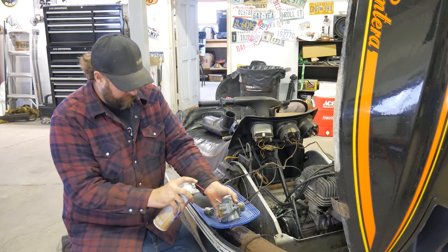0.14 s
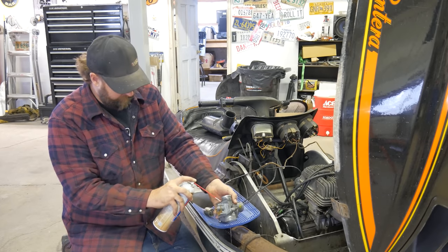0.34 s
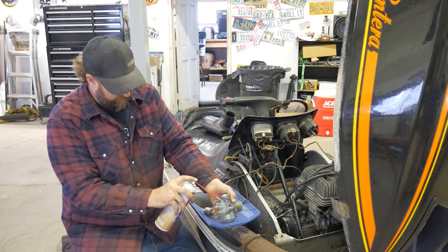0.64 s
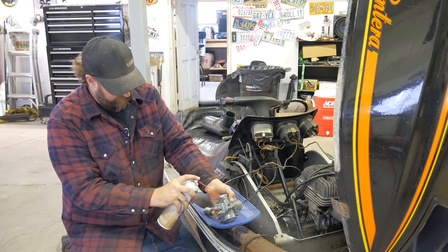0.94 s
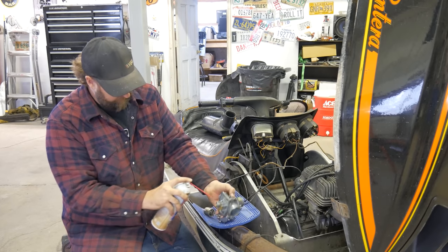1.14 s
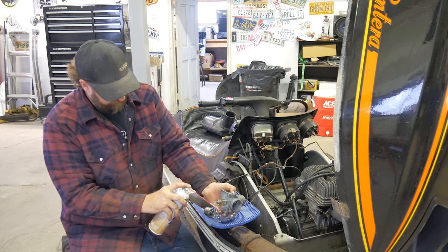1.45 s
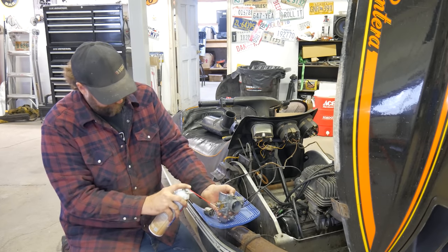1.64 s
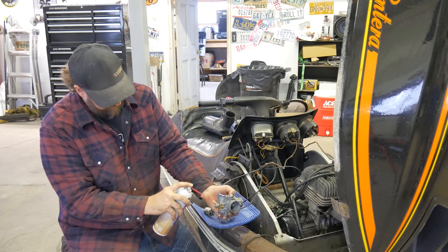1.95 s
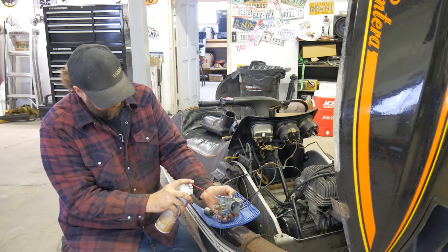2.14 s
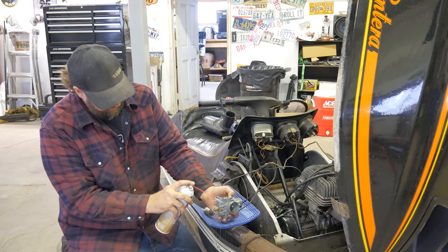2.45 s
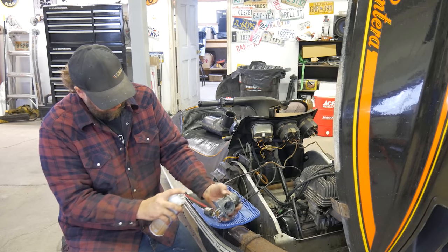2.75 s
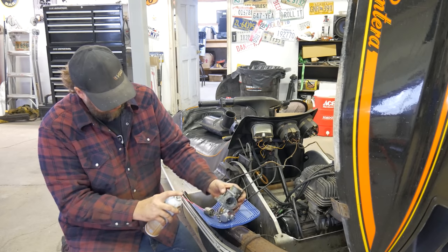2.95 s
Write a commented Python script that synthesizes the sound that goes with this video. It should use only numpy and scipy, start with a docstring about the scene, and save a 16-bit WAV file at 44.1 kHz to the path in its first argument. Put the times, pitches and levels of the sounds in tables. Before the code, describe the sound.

Aerosol spray hisses against a carburetor in a live workshop, centred and fairly close, over faint ventilation and machine hum. A previous spray's tail fades; bursts run 0.14-1.05, 1.4-2.07, 2.2-2.4 and 2.47-2.65 seconds, bright and fluttering, with wet spatters and breathy hollow resonances. A tiny whistling spit comes at 2.45. Room ring follows each stop; light metal ticks from 2.78, soft plastic tray knocks around 3.0.

```python
"""Four bursts of aerosol cleaner are sprayed into a hand-held carburetor in a workshop.
The jet is coloured noise that hisses and flutters; short noise slaps are heavy drops hitting the metal.
Bores ring as bands of noise while the jet crosses them, and the valve spits a brief whistle between bursts.
Small metal ticks are dying bands of noise; at the end, fading sine tones make soft knocks on a tray.
The room rings on as dying noise, over faint ventilation noise and a machine hum."""
import sys
import numpy as np
from scipy import signal
from scipy.fft import rfft, irfft
from scipy.io import wavfile

SR = 44100
rng = np.random.default_rng(int(sys.argv[2]) if len(sys.argv) > 2 else 0)


def unload_audio(sound):
    """Save the sound as a 16-bit wav file, at the path given as the first command line argument."""
    columns = np.transpose(np.atleast_2d(sound))
    # keep every value between -1 and 1, then stretch to whole-number steps
    steps = np.round(np.clip(columns, -1, 1) * 32767)
    wavfile.write(sys.argv[1], SR, steps.astype(np.int16))


N = 136710
TIME = np.arange(N) / SR   # seconds


def from_db(db):
    """Turn decibels into gain."""
    return 10 ** (np.asarray(db) / 20)


def rms_one(x):
    """Scale to an rms of 1."""
    return x / np.sqrt(np.mean(x ** 2) + 1e-20)


def at_hz(points, hz):
    """Read a table between its points, on a log-frequency axis."""
    point_hz, value = np.transpose(points)
    return np.interp(np.log(np.maximum(hz, 1)), np.log(point_hz), value)


def colour(x, spectrum, peaks=()):
    """Filter a steady signal with a broad spectrum plus peaks and dips, then scale it to rms 1."""
    hz = np.arange(N // 2 + 1) * SR / N
    db = at_hz(spectrum, hz)
    for peak_hz, width_hz, gain_db in peaks:
        db = db + gain_db / (1 + (2 * (hz - peak_hz) / width_hz) ** 2)
    low_cut = hz / (hz + 20)
    return rms_one(irfft(rfft(x) * from_db(db) * low_cut, N))


def band_noise(hz, width_hz):
    """Noise kept to one band, like a roughly blown resonance; rms 1."""
    edges_hz = np.clip([hz - width_hz / 2, hz + width_hz / 2], 20, .45 * SR)
    band_pass = signal.butter(2, edges_hz, "band", fs=SR, output="sos")
    return rms_one(signal.sosfilt(band_pass, rng.standard_normal(N)))


def bands(x, count):
    """Split into overlapping bands that add up to the whole: (Hz, band)."""
    centres_hz, spectrum = np.geomspace(200, 16000, count), rfft(x)
    hz = np.arange(len(spectrum)) * SR / N
    for centre_hz, weights in zip(centres_hz, np.eye(count)):
        yield centre_hz, irfft(spectrum * np.interp(hz, centres_hz, weights), N)


def drift(rate_hz):
    """Smooth random wandering with rms 1, made by low-passing noise twice."""
    r = np.exp(-2 * np.pi * rate_hz / SR)
    wander = signal.lfilter([1], [1, -2 * r, r * r], rng.standard_normal(N + SR))
    return rms_one(wander[SR:])   # skip the filter's first second


def ramp(start_s, length_s):
    """Rise from 0 to 1 in a straight line."""
    return np.clip((TIME - start_s) / max(length_s, 1e-5), 0, 1)


def stereo(mid, side):
    """Left and right from middle and side."""
    return np.array([mid + side, mid - side])


# Ventilation noise, middle: pitch_hz, relative level_db (per Hz)
VENTILATION_MID = [(25, -25), (60, -7.5), (120, -9), (250, -4.5), (380, 0.5), (900, -3), (1800, -3),
                   (3000, -6.5), (6000, -19), (10000, -18.5), (15500, -23)]
# Ventilation noise, side: pitch_hz, relative level_db (per Hz)
VENTILATION_SIDE = [(25, -22), (60, -16), (120, 4), (250, 1), (400, 4), (1000, -34), (3000, -29),
                    (8000, -1), (15500, -8)]
# Steady tones of a machine: pitch_hz, level_db (rms)
MACHINE_HUM = [(120, -82), (360.5, -71), (721, -73.5), (958, -74), (1319, -70.5)]
VENTILATION_MID_DB, VENTILATION_SIDE_DB = -59.5, -75
HUM_WANDER_RAD, HUM_WANDER_HZ = 1, 1.8


def ambience():
    """Ventilation is coloured noise; the machine hums in steady tones whose phase wanders."""
    mid = from_db(VENTILATION_MID_DB) * colour(rng.standard_normal(N), VENTILATION_MID)
    side = from_db(VENTILATION_SIDE_DB) * colour(rng.standard_normal(N), VENTILATION_SIDE)
    for hz, db in MACHINE_HUM:
        phase = 2 * np.pi * hz * TIME + HUM_WANDER_RAD * drift(HUM_WANDER_HZ)
        mid = mid + from_db(db) * np.sqrt(2) * np.sin(phase)
    return stereo(mid, side)


# How long the room takes to fade by 60 dB: pitch_hz, fade_s
ROOM_FADE = [(200, 0.3), (1000, 1.28), (3000, 0.91), (5000, 1.15), (8000, 0.46), (12000, 0.43),
             (16000, 0.21)]


def dying_noise(noise):
    """Let each band of a noise die at the room's rate: (Hz, seconds to fade 60 dB, band)."""
    for hz, band in bands(noise, count=18):
        fade_s = max(at_hz(ROOM_FADE, hz), .05)
        yield hz, fade_s, band * from_db(-60 * TIME / fade_s)


EARLIER_TAIL_DB, EARLIER_AGE_S = -43.5, 0.12   # level before fading, and time already faded


def earlier_tail():
    """The room's fading ring from a burst that ended just before the start."""
    noise = colour(rng.standard_normal(N), JET_SPECTRUM)
    tail = 0
    for hz, fade_s, band in dying_noise(noise):
        tail = tail + band * from_db(-60 * EARLIER_AGE_S / fade_s)
    return from_db(EARLIER_TAIL_DB) * tail


# Small metal ticks: start_s, level_db, pitch_hz, decay_s
METAL_TICKS = [(0.114, -57, 10500, .005), (2.177, -54, 11500, .003), (2.780, -52, 6200, .007),
               (2.795, -57.5, 9000, .005), (2.849, -58, 13500, .004), (2.880, -48.7, 12000, .0026),
               (2.901, -56, 7000, .007)]
# The part meets the tray: start_s, level_db
TRAY_KNOCKS = [(2.993, -48), (3.003, -42), (3.046, -49)]
# Tones of the knocked tray: pitch_hz, level_db (relative to the knock), fade_s (time to fall 60 dB)
TRAY_TONES = [(720, -8.5, 0.076), (957, -5, 0.082), (1800, -7.5, 0.058), (2150, -17, 0.036)]
KNOCK_RISE_S = 0.0024   # each knock's tones rise smoothly over this time


def handling():
    """Ticks are dying bands of noise; knocks set off fading tones in the plastic tray."""
    out = 0
    for start_s, db, hz, decay_s in METAL_TICKS:
        dying = (TIME >= start_s) * np.exp(-np.abs(TIME - start_s) / decay_s)
        out = out + from_db(db) * band_noise(hz, 0.45 * hz) * dying
    for start_s, db in TRAY_KNOCKS:
        age_s = np.maximum(TIME - start_s, 0)
        contact = ramp(start_s, KNOCK_RISE_S)
        for hz, tone_db, fade_s in TRAY_TONES:
            fading = from_db(db + tone_db - 60 * age_s / fade_s)
            out = out + fading * contact * np.sin(2 * np.pi * hz * age_s)
    return out


# Valve presses; closing begins at stop_s, and the low rush has its own level relative to the burst:
# start_s, stop_s, level_db, opening_s, closing_s, low_rush_db
VALVE_PRESSES = [(0.136, 1.008, -36.5, 0.034, 0.04, -3), (1.391, 2.029, -35, 0.082, 0.041, -1.5),
                 (2.203, 2.361, -36, 0.051, 0.041, -3), (2.472, 2.610, -35, 0.028, 0.038, -4.5)]
CRACK_SHARE, CRACK_S = .2, .001   # share of the flow that comes at once, and how fast


def flow(lag_s=0, low=False):
    """The valve cracks open, opens fully, holds and closes."""
    out = 0
    for start_s, stop_s, db, opening_s, closing_s, low_rush_db in VALVE_PRESSES:
        crack = CRACK_SHARE * ramp(start_s, CRACK_S)
        opened = crack + (1 - CRACK_SHARE) * ramp(start_s + lag_s, opening_s)
        out = out + from_db(db + low * low_rush_db) * opened * (1 - ramp(stop_s, closing_s))
    return out


# Broad colour of the spray: pitch_hz, relative level_db (per Hz)
JET_SPECTRUM = [(59, -42), (100, -26.5), (327, -15.5), (500, -2), (687, -4.5), (965, -6), (1140, -9.5),
                (1330, -5.5), (2160, -6), (3160, -1.5), (4930, -6.5), (5720, -6.5), (7530, -6.5),
                (13900, -8), (15800, -15.5)]
# Steady resonances and dips of the carburetor body: pitch_hz, width_hz, gain_db
BODY_RESONANCES = [(159, 19, 7), (406, 66, 1.5), (505, 40, 7), (600, 110, -3.5), (759, 35, 5.5),
                   (1009, 113, 7.5), (1180, 54, -3.5), (1268, 154, 2.5), (1710, 98, -3.5), (1850, 43, 2.5),
                   (2450, 100, 2), (3350, 1600, -2.5), (5650, 340, 3), (6130, 40, 4.5), (7680, 270, 1),
                   (7570, 180, -5), (8750, 280, 0.5)]
DROPS_PER_S, DROPS_DB = 2500, -5.5   # level against the raw hiss
WANDER_DB, WANDER_HZ = 1.5, 4   # the colour shifts as the aim trembles
FLUTTER_DB, FLUTTER_HZ, SURGE_DB, SURGE_HZ = 0.73, 80, 0.7, 24
RUSH_LAG_S, RUSH_BELOW_HZ = 0.0061, 1070   # the low rush builds once liquid arrives


def jet():
    """Fluttering gas hiss and droplet impacts, coloured by the carburetor as the aim trembles."""
    drops = rng.choice([-1, 1], N) * (rng.random(N) < DROPS_PER_S / SR)
    raw = rng.standard_normal(N) + from_db(DROPS_DB) * rms_one(drops)
    coloured = colour(raw, JET_SPECTRUM, BODY_RESONANCES)
    hiss = 0
    for hz, band in bands(coloured, count=64):
        hiss = hiss + band * from_db(WANDER_DB * drift(WANDER_HZ))
    hiss = rms_one(hiss)
    low_pass = signal.butter(2, RUSH_BELOW_HZ, fs=SR, output="sos")
    rush = signal.sosfiltfilt(low_pass, hiss)
    unsteady = from_db(FLUTTER_DB * drift(FLUTTER_HZ) + SURGE_DB * drift(SURGE_HZ))
    return unsteady * ((hiss - rush) * flow() + rush * flow(RUSH_LAG_S, low=True))


# Heavy drops slap on the metal: start_s, level_db (before the low cut)
HEAVY_DROPS = [(0.174, -28.5), (0.322, -27), (0.337, -25), (0.441, -49), (0.527, -31), (1.459, -41),
               (1.496, -26), (1.644, -36), (1.819, -29), (1.896, -37), (2.375, -38), (2.593, -31)]
SPLAT_DECAY_S, SPLAT_ABOVE_HZ = .0015, 600


def splats():
    """Short slaps of liquid: coloured noise that starts at once and dies quickly."""
    level = 0
    for start_s, db in HEAVY_DROPS:
        dying = np.exp(-np.abs(TIME - start_s) / SPLAT_DECAY_S)
        level = level + from_db(db) * (TIME >= start_s) * dying
    slaps = level * colour(rng.standard_normal(N), JET_SPECTRUM, BODY_RESONANCES)
    high_pass = signal.butter(2, SPLAT_ABOVE_HZ, "high", fs=SR, output="sos")
    return signal.sosfilt(high_pass, slaps)


# The jet blows across a bore or passage: start_s, stop_s, pitch_hz, width_hz, level_db
BORE_CROSSINGS = [(0.268, 0.37, 2680, 260, -48.5), (0.507, 0.58, 3160, 400, -46.5),
                  (0.507, 0.893, 3940, 300, -53), (0.682, 0.777, 3130, 380, -43),
                  (0.82, 1.056, 3110, 480, -48), (1.46, 1.665, 486, 70, -50.5),
                  (1.55, 1.74, 3200, 400, -51), (1.68, 1.854, 970, 220, -51), (1.412, 1.56, 2930, 320, -47),
                  (1.42, 1.51, 5700, 220, -46), (1.70, 2.04, 3330, 680, -43),
                  (1.69, 1.90, 9000, 1100, -45.5), (1.76, 2.01, 5650, 350, -60),
                  (2.26, 2.36, 900, 250, -62), (2.237, 2.32, 8760, 700, -46),
                  (2.30, 2.378, 6800, 500, -46.5), (2.21, 2.375, 3100, 450, -41),
                  (2.343, 2.375, 460, 140, -46), (2.475, 2.62, 3080, 520, -42.5),
                  (2.523, 2.614, 2290, 350, -46.5), (2.54, 2.62, 1410, 350, -48.5),
                  (2.55, 2.586, 368, 182, -50)]
BORE_FADE_S = 0.016


def bores():
    """Each cavity rings as a band of noise while the jet crosses it."""
    out = 0
    for start_s, stop_s, hz, width_hz, db in BORE_CROSSINGS:
        fade_in = ramp(start_s, BORE_FADE_S)
        fade_out = 1 - ramp(stop_s - BORE_FADE_S / 2, BORE_FADE_S)
        out = out + from_db(db) * band_noise(hz, width_hz) * fade_in * fade_out
    return out


SPIT_S, SPIT_LENGTH_S, SPIT_HZ, SPIT_DB = 2.4524, .0040, 3100, -32.5   # length until it starts to die
SPIT_EDGE_S, SPIT_RING_S, SPIT_ROUGH = 0.00051, 0.00055, 0.16   # rise, decay, share of noise


def spit():
    """A puff through the barely open valve whistles for a few milliseconds."""
    dying = np.exp(-np.maximum(TIME - SPIT_S - SPIT_LENGTH_S, 0) / SPIT_RING_S)
    tone = np.sin(2 * np.pi * SPIT_HZ * (TIME - SPIT_S))
    whistle = tone + SPIT_ROUGH * band_noise(SPIT_HZ, 1800)
    return from_db(SPIT_DB) * ramp(SPIT_S, SPIT_EDGE_S) * dying * whistle


# Close reflections off the hands, the tray and the hood: delay_s, level_db
CLOSE_REFLECTIONS = [(.0023, -17), (.0034, -14.5), (.0049, -16), (.0066, -18), (.0091, -20), (0.013, -20.5)]
TREMBLE_S, TREMBLE_HZ = .00005, 2.56   # the moving hands change these paths


def near_echoes(x):
    """Delayed copies put a shifting ripple on the spectrum; the sum is scaled to keep its power."""
    out, power = x, 1
    for delay_s, db in CLOSE_REFLECTIONS:
        heard_from = TIME - delay_s - TREMBLE_S * drift(TREMBLE_HZ)
        out = out + from_db(db) * np.interp(heard_from, TIME, x, left=0)
        power = power + from_db(db) ** 2
    return out / np.sqrt(power)


# Strength of the room's ring: pitch_hz, level_db
ROOM_STRENGTH = [(200, -3), (1000, -8.5), (3000, -6), (6000, -10), (10000, -14), (16000, -14.5)]


def room_response():
    """Workshop reverberation: noise whose bands each have their own level and fading time."""
    tail = 0
    for hz, fade_s, band in dying_noise(rng.standard_normal(N)):
        even_energy = np.sqrt(2 * np.log(1000) / (fade_s * SR))   # long and short fades weigh the same
        tail = tail + band * from_db(at_hz(ROOM_STRENGTH, hz)) * even_energy
    return tail * ramp(0.0095, 0.025)


TURNS_PER_S = .7


def room(x):
    """As the can and the part turn, the sound swings between two sets of paths through the room."""
    turn = 2 * np.pi * TURNS_PER_S * TIME
    out = 0
    for share in (np.cos(turn), np.sin(turn)):
        out = out + signal.fftconvolve(x * share, room_response())[:N]
    return out


# Side share of the direct sound: pitch_hz, level_db
MICROPHONE_MISMATCH = [(100, -22), (500, -25), (2000, -62), (5000, -33), (14000, -18.5)]
BORES_IN_ROOM_DB = -4   # the open bores face forward and feed the room less than the jet does
ROOM_WIDTH = .22   # side share of the room


def scene():
    """Spray and handling straight ahead, in the room, heard by two closely spaced microphones."""
    spray = jet() + splats() + spit() + handling()
    ringing = bores()
    direct = near_echoes(spray + ringing)
    into_room = spray + from_db(BORES_IN_ROOM_DB) * ringing
    hz = np.arange(N // 2 + 1) * SR / N
    mismatch = 1j * from_db(at_hz(MICROPHONE_MISMATCH, hz))   # 1j is a quarter-cycle shift
    direct_side = irfft(rfft(direct) * mismatch, N)
    mid = direct + room(into_room) + earlier_tail()
    side = direct_side + ROOM_WIDTH * (room(into_room) + earlier_tail())
    return stereo(mid, side) + ambience()


CUTOFF_HZ = 15800


def record(dry):
    """The top is cut steeply."""
    low_pass = signal.ellip(12, .1, 80, CUTOFF_HZ, fs=SR, output="sos")
    return signal.sosfilt(low_pass, dry)


dry = scene()
out = record(dry)
unload_audio(out)
```